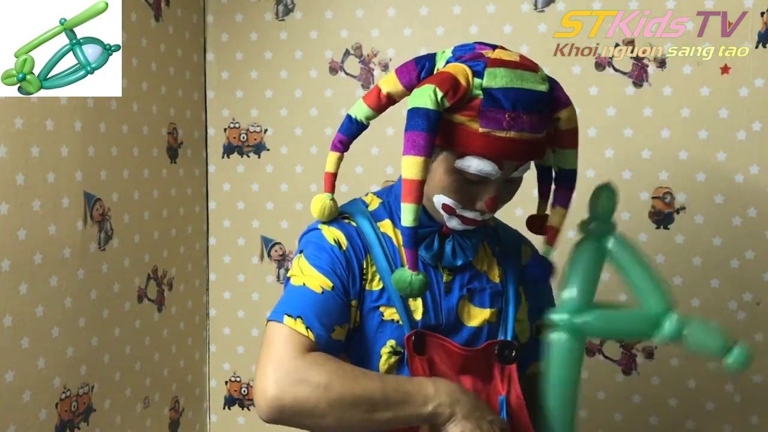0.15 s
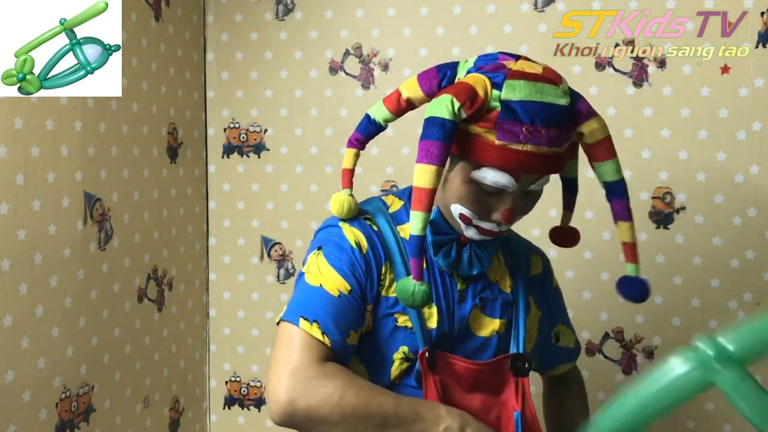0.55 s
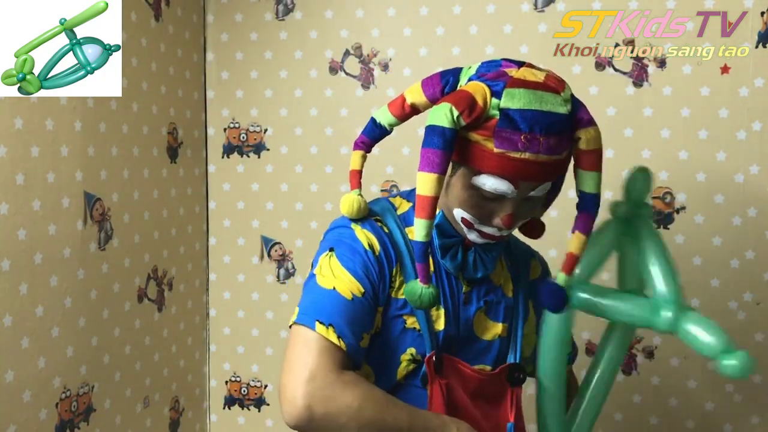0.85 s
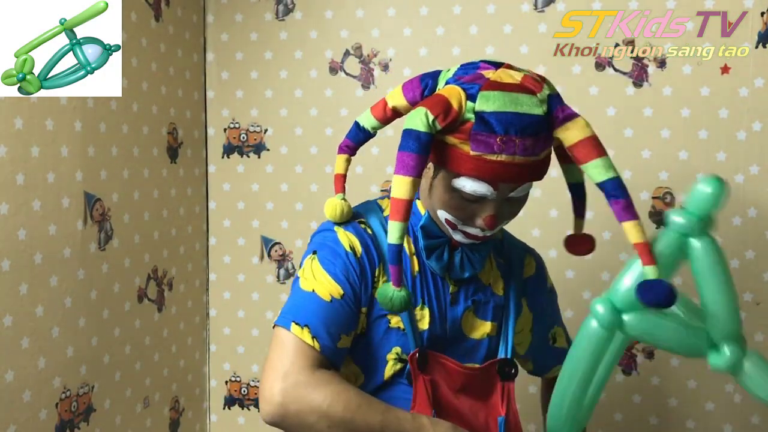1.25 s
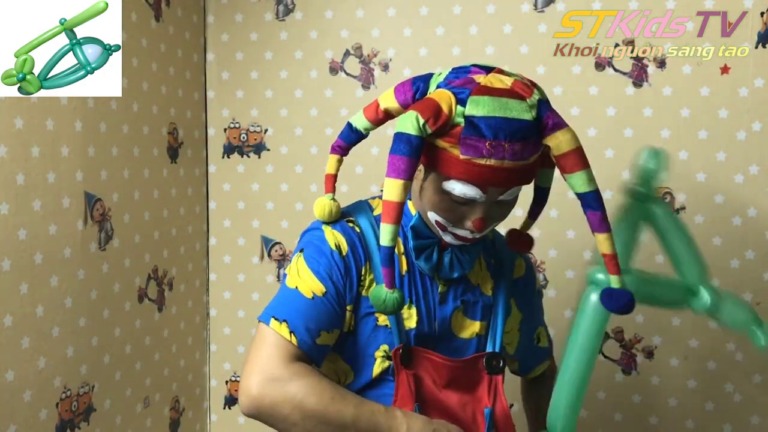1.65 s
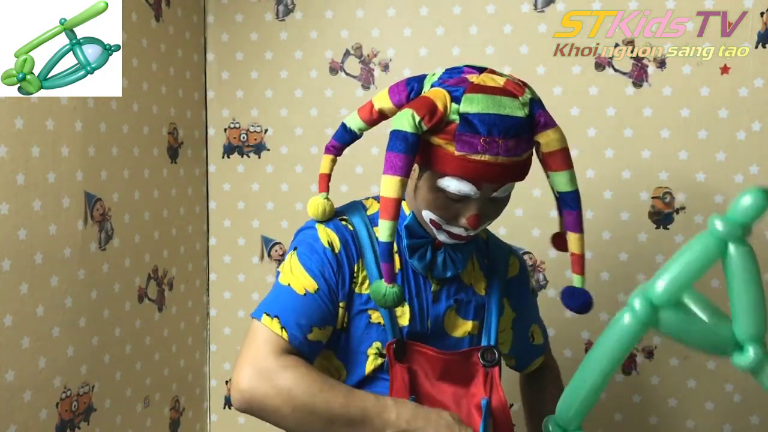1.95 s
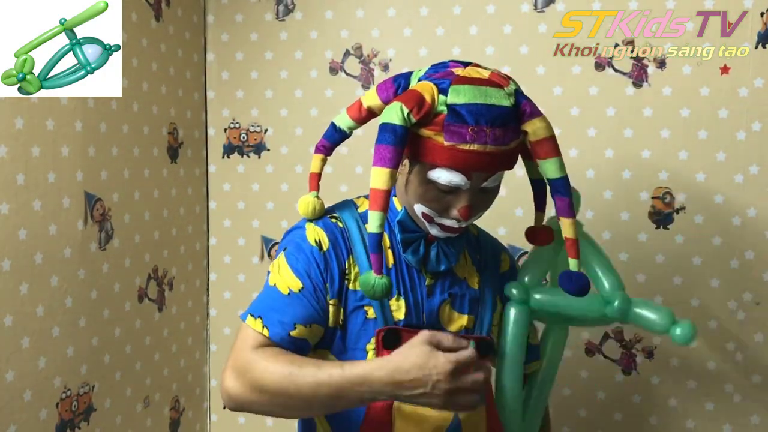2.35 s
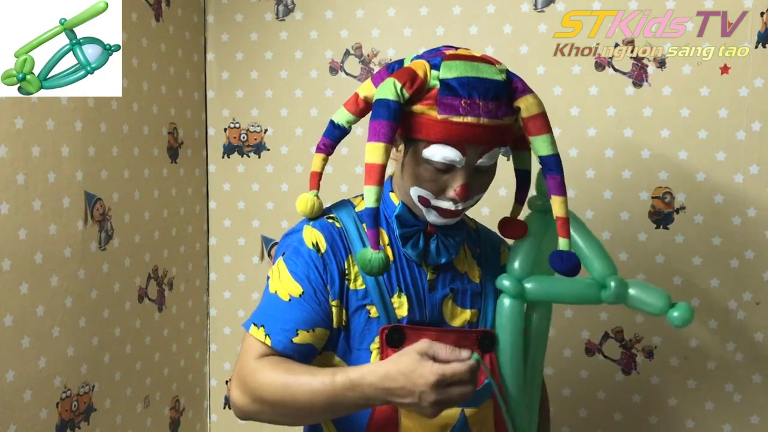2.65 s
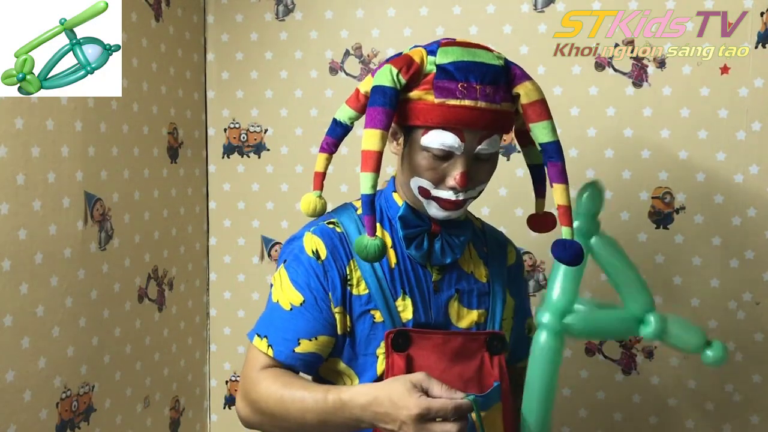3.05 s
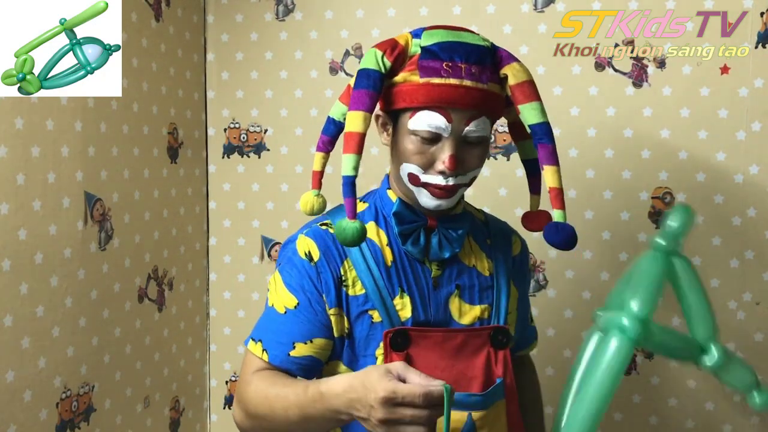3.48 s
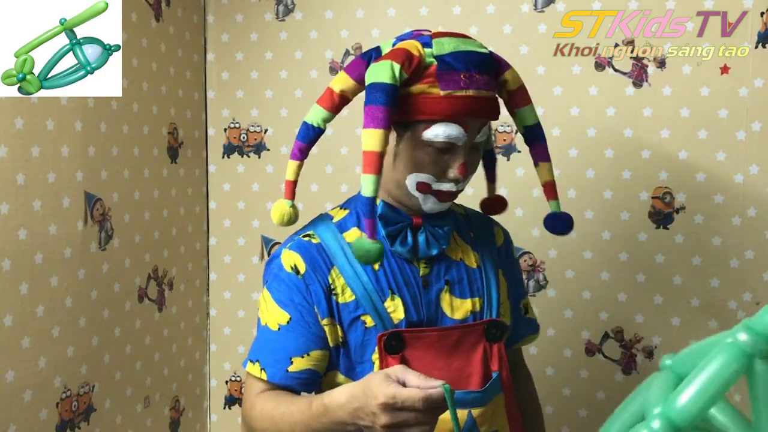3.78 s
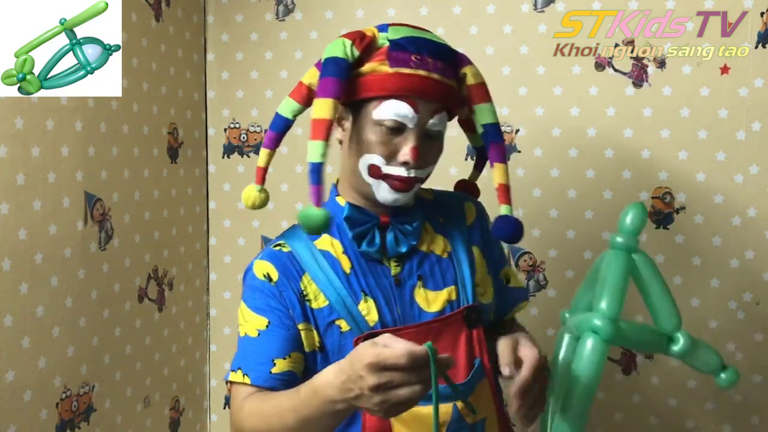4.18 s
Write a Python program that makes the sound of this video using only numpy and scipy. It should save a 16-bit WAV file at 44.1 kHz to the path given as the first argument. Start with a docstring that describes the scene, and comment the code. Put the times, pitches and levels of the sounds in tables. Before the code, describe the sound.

Inflated rubber balloons rub against cloth and each other close by, with crackly snaps, soft bumps and one short squeak in a quiet room.

```python
"""Inflated rubber balloons, twisted into a figure, swung about and rubbing on a shirt and on each other.
Close to one microphone in a small quiet room, the skin sticks and slips in dense clicks that ring the
air tubes, and cloth swishes over the rubber. Now and then the skin snaps or the figure bumps softly;
once it squeaks. Behind it are room tone and a low wavering hum."""
import sys
import numpy as np
from scipy import signal
from scipy.fft import rfft, irfft
from scipy.io import wavfile
from scipy.ndimage import uniform_filter1d

SR = 44100
rng = np.random.default_rng(int(sys.argv[2]) if len(sys.argv) > 2 else 0)


def digitize_waveform(pressure):
    """Quantize a signal to 16-bit integers and store it at the path in sys.argv[1].

    Rows of a 2-D input are taken as channels; values are limited to [-1, 1].
    """
    field = np.atleast_2d(pressure).T
    bounded = np.clip(field, -1, 1)
    quanta = np.round(bounded * 32767).astype(np.int16)
    wavfile.write(sys.argv[1], SR, quanta)


N = 190732


def amp(db):
    return 10 ** (np.asarray(db) / 20)


def unit_rms(x):
    return x / np.sqrt(np.mean(x ** 2) + 1e-20)


def at_hz(points, hz):
    f, value = np.transpose(points)
    return np.interp(np.log(hz + 1), np.log(f + 1), value)


def add(mix, start, sound):
    part = mix[round(start * SR):][:len(sound)]
    part += sound[:len(part)]


def coloured(x, spectrum):
    """Zero-phase filter by a spectrum in dB; rms 1."""
    return unit_rms(irfft(rfft(x) * amp(at_hz(spectrum, np.fft.rfftfreq(N, 1 / SR))), N))


def resonate(x, hz, width):
    """A resonance that can glide: shift hz down to zero, smooth, shift back."""
    turn = np.exp(2j * np.pi * np.cumsum(hz * np.ones(len(x))) / SR)
    pole = np.exp(-np.pi * width / SR)
    return 2 * (turn * signal.lfilter([1 - pole], [1, -pole], x / turn + 1e-18)).real


def band(x, hz, width, second_width):
    """Two resonances in series; rms 1."""
    return unit_rms(resonate(resonate(x, hz, width), hz, second_width))


def wander(seconds):
    """Smooth random drift of rms 1."""
    size = max(round(seconds * SR), 2)
    return unit_rms(uniform_filter1d(uniform_filter1d(rng.standard_normal(N), size), size))


# The quiet room at the microphone: (frequency [Hz], relative level [dB])
ROOM_TONE = [(15, -36), (25, 18.5), (97, -7), (153, -4.5), (249, 0.5), (463, -12), (1290, -4.5),
             (6210, -28), (7710, -31), (13600, -22), (16000, -24)]
def room_tone():
    """Faint, nearly steady rumble and hiss."""
    return amp(-66.5 + 0.33 * wander(0.44)) * coloured(rng.standard_normal(N), ROOM_TONE)


# The hum in the background: (time [s], level [dB])
HUM_LEVELS = [(0.0, -66), (0.11, -55), (0.2, -67), (0.81, -68), (0.9, -58), (1.02, -68), (2.33, -66),
              (2.66, -55), (2.79, -75), (2.91, -56), (2.98, -76), (3.09, -67), (3.5, -67), (3.57, -59),
              (3.62, -69.5), (4.13, -66.5), (4.23, -46.5), (4.32, -72)]
def hum(hz=99.9, waver_db=2.5, swell_s=0.03):
    """A fuzzy low hum that wavers, and swells with each bump."""
    tone = band(rng.standard_normal(N), hz, 2.7, 36)
    tone /= np.sqrt(0.29 + abs(uniform_filter1d(tone ** 2, size=1320)))  # steadier than plain noise
    level_db = np.interp(np.arange(N) / SR, *np.transpose(HUM_LEVELS))
    level = amp(level_db + waver_db * wander(0.024))
    age = np.arange(SR // 2) / SR / swell_s
    for start, db, *_ in BUMPS:
        add(level, start, amp(db - 14) * age ** 2 * np.exp(1 - age ** 2))
    return level * tone


# Decay of the small room: (frequency [Hz], t60 [s])
ROOM_DECAY = [(300, 0.29), (2000, 0.36), (6000, 0.22), (15000, 0.049)]
def room_echoes(x):
    """Sparse echoes reach the microphone from 4 ms on, each band dying at its own speed."""
    taps = np.zeros(SR // 2)
    slots = np.arange(180, SR // 2 - 20, 20)
    taps[slots + rng.integers(0, 20, len(slots))] = rng.choice([-1., 1.], len(slots))
    hz, t, spectra = signal.stft(taps, SR, nperseg=256)
    decay = amp(-60 * t / at_hz(ROOM_DECAY, hz)[:, None])
    tail = signal.istft(spectra * decay, SR, nperseg=256)[1]
    return signal.fftconvolve(x, tail / np.linalg.norm(tail))[:N]


# Soft bumps: (time [s], level [dB], pitch [Hz], t60 [s], thud relative to tone [dB])
BUMPS = [(0.069, -56.5, 62.7, 0.48, 4), (0.878, -47.5, 43.6, 0.31, -4), (1.219, -53, 56.5, 0.2, -14),
         (1.657, -55, 54.4, 0.36, 1), (2.216, -49, 40.4, 0.27, -27), (2.427, -58, 78.5, 0.78, 10),
         (2.606, -61, 79, 0.15, 1), (3.521, -48.5, 44.3, 0.22, -2), (4.16, -45, 74.5, 0.1, -1),
         (4.187, -36.5, 79.3, 0.19, -4.5), (4.217, -46.5, 77.4, 0.33, -7)]
def bumps():
    """Body and balloons meet: a low tone with a soft start and a dull thud above it."""
    out, t = np.zeros(N), np.arange(SR // 3) / SR
    for start, db, hz, t60, thud_db in BUMPS:
        puff = resonate(resonate(rng.standard_normal(len(t)), 157, 280), 166, 420)
        thud = amp(thud_db - 1.5) * unit_rms(puff)
        envelope = amp(db + 0.5 - 60 * t / t60) * (1 - np.exp(-t / 0.01))
        add(out, start, envelope * (np.sin(2 * np.pi * hz * t) + thud))
    return out


# Snaps close to the microphone: (time [s], crack level [dB], knock level [dB])
SNAPS = [(0.069, -29, -36), (0.3192, -31, -33), (0.3323, -19, -24), (0.4144, -20, -17), (0.4195, -24, -22),
         (0.4316, -26, -42), (0.4393, -26, -27), (0.4536, -24, -20), (0.4586, -19, -20), (0.4654, -27, -31),
         (0.5853, -31, -34), (0.713, -38, -46), (1.0134, -31, -33), (1.1208, -31, -35), (1.1874, -34, -53),
         (1.3553, -26, -23), (1.3762, -22, -22), (1.3833, -23, -40), (1.4093, -20, -39), (1.4131, -20, -28),
         (1.5516, -34, -46), (1.6588, -27, -43), (1.9005, -28, -39), (2.1957, -14, -22), (2.4048, -29, -31),
         (2.4787, -25, -48), (2.4897, -24, -35), (2.502, -22, -38), (2.5096, -23, -49), (2.5167, -21, -31),
         (2.5254, -21, -38), (2.5325, -17, -32), (2.5457, -19, -29), (2.5561, -21, -34), (2.5697, -21, -24),
         (2.5976, -23, -30), (2.6194, -23, -33), (2.6289, -27, -34), (2.6554, -25, -31), (2.6637, -19, -22),
         (2.8538, -40, -38), (2.8807, -43, -33), (2.9782, -32, -35), (2.9893, -34, -30), (4.1874, -44, -38),
         (4.2177, -43, -39)]
def snaps():
    """The rubber lets go at once: a bright crack and a duller knock of the tubes."""
    out, t = np.zeros(N), np.arange(1200) / SR
    jolt = 1.5 * np.cos(2 * np.pi * 7800 * t) * np.exp(-t / 6.5e-5)  # a kick and its recoil
    for start, crack_db, knock_db in SNAPS:
        noise = rng.standard_normal(len(t))
        crack = jolt + 0.099 * noise * amp(-60 * t / 0.0073) + 0.021 * noise[::-1] * amp(-60 * t / 0.043)
        knock_hz = 1700 * np.exp(0.13 * noise[-2])
        knock = 1.3 * np.sin(2 * np.pi * knock_hz * t) * amp(-60 * t / 0.004)
        snap = np.sign(noise[-1]) * (amp(crack_db) * crack + amp(knock_db) * knock)
        add(out, start, snap)
        add(out, start + 0.0028, amp(-10) * snap)  # echo off the near wall
    low_cut = signal.butter(2, 600, 'high', fs=SR, output='sos')  # thin rubber has no bass
    return signal.sosfilt(low_cut, out)


def squeak(start=2.205, climb_s=0.055, peak_s=2.262, slow_hz=429.4, sing_hz=1350):
    """Rubber drags on rubber ever faster until it sings: a rough rising tone with a weak octave."""
    t = np.arange(N) / SR
    climb = np.clip((t - start) / climb_s, 0, 1)
    hz = slow_hz + (sing_hz - slow_hz) * np.sin(np.pi / 2 * climb) ** 2
    db_per_s = np.where(t < peak_s, 410, -450)
    db = -24.5 + db_per_s * (t - peak_s) + 3 * wander(0.002)
    phase = 2 * np.pi * np.cumsum(hz * (1 + 0.0284 * wander(0.0027))) / SR
    return amp(db) * np.minimum(5 * climb, 1) * (np.sin(phase) + 0.24 * np.sin(2 * phase))


# Brief rings of the rubber: (time [s], length [s], first pitch [Hz], last pitch [Hz], level [dB])
PATCH_RINGS = [(.415, 0.03, 1520, 1500, -41), (1.021, 0.012, 1660, 1660, -41.5),
               (1.039, 0.066, 2040, 2570, -42), (1.122, 0.012, 1660, 1670, -43),
               (1.146, 0.03, 1650, 1560, -47), (1.185, 0.01, 1650, 1690, -41),
               (1.286, 0.049, 1064, 990, -48), (1.338, 0.035, 965, 1100, -41),
               (1.362, 0.023, 2870, 3020, -42), (1.396, 0.062, 1370, 1270, -36),
               (1.412, 0.032, 2270, 2390, -35.5), (1.568, 0.026, 936, 900, -42.5),
               (2.208, 0.03, 2210, 2100, -39), (2.228, 0.023, 2440, 2650, -33.5),
               (2.885, 0.012, 455, 463, -42), (2.981, 0.019, 1560, 1540, -46.5)]
def patch_rings():
    """A rubbed patch rings out: friction noise in one narrow gliding resonance."""
    out = np.zeros(N)
    noises = rng.standard_normal((len(PATCH_RINGS), 6000))
    for (start, length, first_hz, last_hz, db), noise in zip(PATCH_RINGS, noises):
        size = int(length * SR)
        tone = band(noise[:size], np.linspace(first_hz, last_hz, size), 85, 170)
        add(out, start, amp(db) * tone * signal.windows.tukey(size, 0.7))
    return out


def slips(per_s, spread_db):
    """Tiny stick-slip clicks of random sign; a few are large."""
    signs = np.sign(rng.standard_normal(N)) * (rng.random(N) < per_s / SR)
    return unit_rms(signs * amp(spread_db * np.minimum(rng.exponential(1, N), 4)))


def balloon_body(drive, modes):
    """Steep resonances of alternating sign; their shares drift as the grip moves along the tubes."""
    out = np.zeros(N)
    for k, (hz, width, db) in enumerate(modes):
        share = (-1) ** k * amp(db + 3.12 * wander(0.064))
        out += share * resonate(resonate(drive, hz, width), hz, 1.83 * width)
    return unit_rms(out)


# Strokes of rubbing in front of the microphone; the last three are offsets from the tube level:
# (time [s], rise [s], tube level [dB], fade [dB/s], skin [dB], swish [dB], hollow [dB])
STROKES = [ (0.0, 0.0011, -38, 278, 1, -5.5, -5), (0.067, 0.013, -39.5, 139, 3, -2.5, -11),
           (.19, 0.071, -51.5, 200, 5, 6.5, -6), (.13, 0.048, -49.5, 100, -2, -1.5, -7),
           (.24, .07, -50.5, 100, 3, -2, -2), (.319, 0.012, -40.5, 133, 5.5, -2, -0.5),
           (0.416, 0.0046, -29, 400, -3, -13, -7), (0.434, 0.034, -31.5, 440, 1, -8, -4.5),
           (.49, 0.045, -47.5, 50, 1, -1, -9), (0.581, 0.028, -37, 247, 4, -16, -17.5),
           (.70, 0.02, -49, 150, -2, -1.5, -20), (.745, 0.028, -43.5, 44.5, 2, -6.5, -3),
           (.84, 0.044, -48, 69.6, 4, -10.5, -3), (1.011, .003, -39.5, 110, -2.5, -17, -8.5),
           (1.035, .02, -48.5, 200, 5, 5, -8), (1.06, .03, -47.5, 100, 6, -2.5, -9.5),
           (1.11, 0.026, -46.5, 330, 6.5, -4.5, -8.5), (1.189, .003, -46.5, 253, 4, -4, -12),
           (1.241, 0.15, -39, 200, -7, -9.5, -14), (1.342, 0.026, -32.5, 111, 3, -4, -9),
           (1.38, 0.047, -34, 150, 2.5, -4.5, -14.5), (1.45, 0.017, -43, 110, 0, -23, -13.5),
           (1.552, 0.037, -36.5, 394, 0, -14, -9), (1.6, 0.057, -41.5, 150, -5, -9, -19),
           (1.646, 0.018, -41, 248, 5, -4.5, -11), (1.68, .02, -46, 150, 2, -7, -14),
           (1.71, 0.025, -49, 150, -1, -10, -2), (1.77, 0.028, -52.5, 243, -7, 2, -7),
           (1.898, 0.002, -58.5, 155, 13.5, 7, -16), (1.94, 0.063, -44, 59.6, -8.5, -18, -13),
           (2.03, .054, -37.5, 227, -5, -10.5, -4.5), (2.194, 0.0014, -36.5, 62.6, 6.5, -3, -11),
           (2.21, 0.029, -29.5, 293, 1.5, -18, -27), (2.3, 0.026, -47.5, 55, -10, -3, -16),
           (2.355, 0.048, -36, 210, -6, -10, -9.5), (2.431, 0.086, -52.5, 50, 15.5, 11, 10.5),
           (2.49, 0.052, -42, 40, 4, -4, -4.5), (2.663, 0.0028, -36.5, 302, 7.5, -7, -8),
           (2.69, 0.026, -49, 119, 1.5, -0.5, -6.5), (2.851, 0.0035, -46.5, 300, 0, -3.5, -3.5),
           (2.88, 0.0025, -43.5, 132, -4.5, -8.5, 1.5), (2.92, 0.031, -53, 60, -2, -8, 2),
           (2.977, .008, -44, 123, 0, -9, -14), (3.04, .02, -58.5, 97.3, 5, 5.5, -8),
           (3.11, 0.054, -62.5, 40, 9.5, 13.5, 0.5), (3.19, 0.065, -56, 100, 5, 9.5, 0.5),
           (3.26, 0.021, -56.5, 150, 3, -0.5, 3), (3.31, 0.043, -52, 89, 2.5, -4, -4),
           (3.385, 0.023, -58, 80, 3, 4.5, -8), (3.47, 0.047, -55, 163, -4, 2.5, -0.5),
           (3.61, 0.1, -62, 30, 7, 10.5, -12), (3.7, 0.036, -60, 62.5, 7, 9, -19),
           (3.76, 0.032, -53, 604, 5, 0.5, -2.5), (3.84, 0.07, -56, 100, -2, -11, -23),
           (3.928, 0.015, -52.5, 149, -1, -1.5, -9.5), (4.0, 0.019, -58.5, 250, 0, 4.5, -1.5),
           (4.03, 0.031, -57.5, 222, -2, -2.5, -2.5), (4.167, 0.0058, -56, 600, -10, -0.5, -4),
           (4.186, 0.0085, -52, 201, 2.5, -3.5, -2), (4.205, 0.014, -46.5, 343, -8, -13.5, 6)]
def strokes(duck_db=-6):
    """Envelopes of tubes, skin, swish and hollow: each stroke swells, then fades; powers add."""
    power = np.zeros((4, N))
    fade_ratios = np.array([[1], [1.005], [0.75], [0.94]])
    for start, rise, db, db_per_s, skin_db, swish_db, hollow_db in STROKES:
        at = round(start * SR)
        t = np.arange(min(N - at, SR)) / SR
        swell = np.minimum(t / rise, 1)
        power[:, at:at + SR] *= amp(duck_db * swell) ** 2  # a new stroke displaces the older ones
        peak_db = db + np.array([[0], [skin_db], [swish_db], [hollow_db]])
        level_db = peak_db - fade_ratios * db_per_s * np.maximum(t - rise, 0)
        level_db[1] += 7.5 * np.exp(-t / 0.0059)  # the skin rings most as a stroke sets in
        power[:, at:at + SR] += (swell ** 0.65 * amp(level_db)) ** 2
    return np.sqrt(power)


# Resonances of air tubes, thin skin and whole hollow figure: (frequency [Hz], width [Hz], level [dB])
TUBE_MODES = [(933, 233, -3), (1183.6, 124, -2.5), (1246, 96, 1.5), (1575, 525, -3.5)]
SKIN_MODES = [(1964, 750, -5), (2633, 420, 4.5), (2990, 820, -2.5), (4245, 670, -3), (5660, 1280, -7.5)]
HOLLOW_MODES = [(283, 118, -5.5), (410, 131, -3), (514, 155, -1.5), (707, 115, 4)]
# The shirt on the rubber, heard close: (frequency [Hz], relative level [dB])
CLOTH_SPECTRUM = [(590, -62), (1000, -34), (1220, -5.5), (2500, -8), (2810, -13.5), (3390, -5),
                  (15000, -11.5), (15900, -19), (16500, -46)]
def rubbing():
    """Shared slips and smooth friction ring each part of the balloons; cloth adds a wide swish."""
    tube_level, skin_level, swish_level, hollow_level = strokes()
    grit = np.clip(0.4 + 0.16 * wander(0.03), 0, 1)  # share of separate slips in the friction
    patch_hz = 2306 * (1 + 0.082 * wander(0.084))
    clicks = slips(per_s=600, spread_db=2.5)
    friction = grit * clicks + np.sqrt(1 - grit ** 2) * rng.standard_normal((4, N))
    on_tubes, on_skin, on_hollow, on_cloth = friction
    patch = amp(-9) * band(on_skin, patch_hz, 580, 1030)
    skin = amp(-2) * skin_level * (balloon_body(on_skin, SKIN_MODES) + patch)
    tubes = tube_level * balloon_body(on_tubes, TUBE_MODES)
    hollow = amp(-1.96) * hollow_level * balloon_body(on_hollow, HOLLOW_MODES)
    flicker = amp(3 + 0.46 * wander(0.0045))
    crackle = 0.24 * slips(per_s=250, spread_db=0.5)
    swish = swish_level * flicker * coloured(on_cloth + crackle, CLOTH_SPECTRUM)
    return amp(-1.5 + 0.81 * wander(0.035)) * (tubes + skin + hollow + swish)


def scene():
    """The balloons up close in mono, the room's echoes well below them."""
    rub = rubbing() + squeak() + patch_rings()
    snap = snaps()
    echoes = room_echoes(amp(-11) * rub + amp(-14.5) * snap)
    return (rub + snap + echoes + bumps() + hum() + room_tone())[None]


# Dips of the microphone housing: (frequency [Hz], width [Hz], gain [dB])
HOUSING_DIPS = [(5250, 1550, -3), (7890, 650, -4), (10510, 1080, -3.5)]
def record(dry, low_hz=40, high_hz=15750):
    """The microphone: bass roll-off and narrow dips of its housing, then the band limit."""
    hz = np.fft.rfftfreq(N, 1 / SR)
    dips = amp(sum(db * np.exp(-((hz - centre) / width) ** 2) for centre, width, db in HOUSING_DIPS))
    roll_off = 1 / np.sqrt(1 + (low_hz / (hz + 1)) ** 16)
    heard = irfft(rfft(dry) * dips * roll_off, N)
    band_limit = signal.firwin(511, high_hz, window=("kaiser", 9), fs=SR)
    return signal.oaconvolve(heard, band_limit[None], "same")


dry = scene()
out = record(dry)
digitize_waveform(out)
```